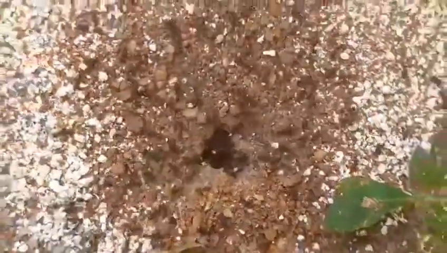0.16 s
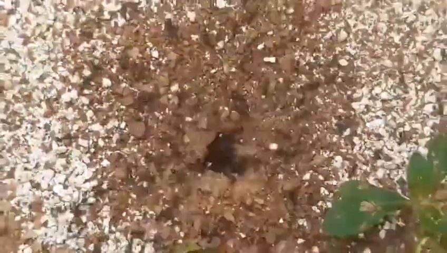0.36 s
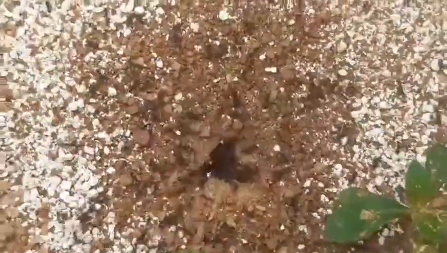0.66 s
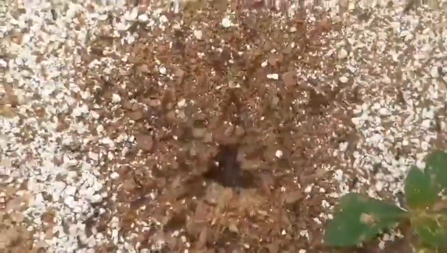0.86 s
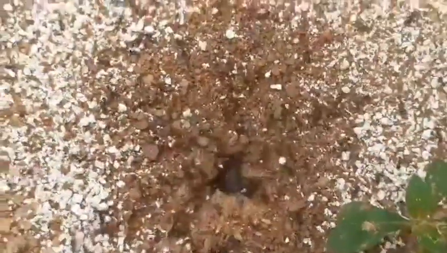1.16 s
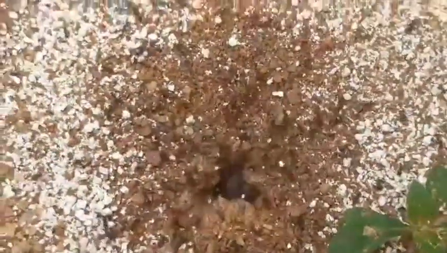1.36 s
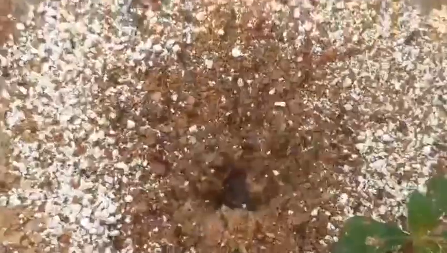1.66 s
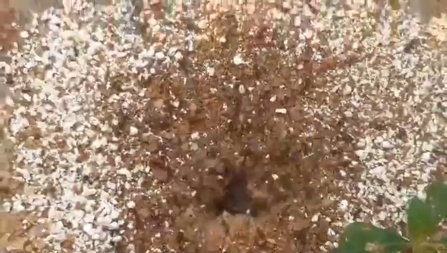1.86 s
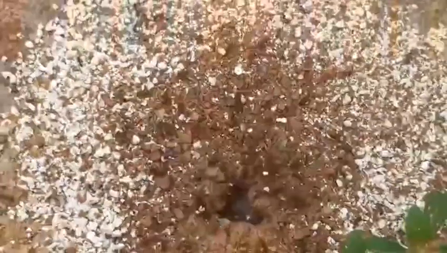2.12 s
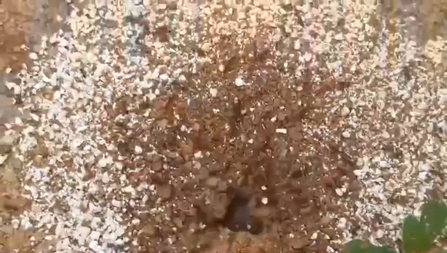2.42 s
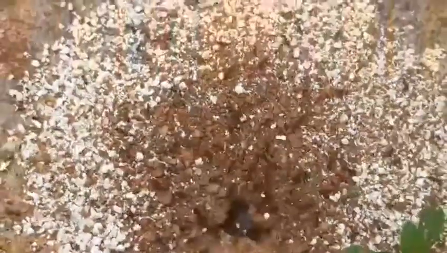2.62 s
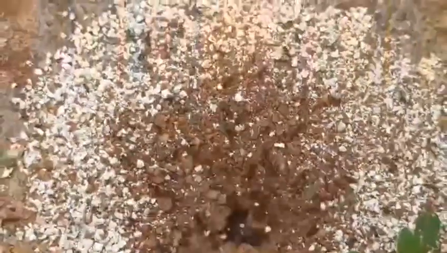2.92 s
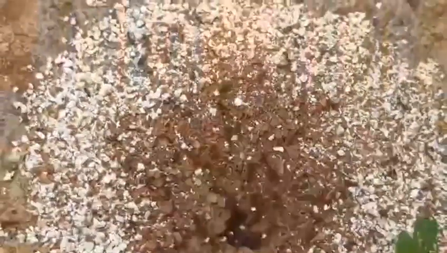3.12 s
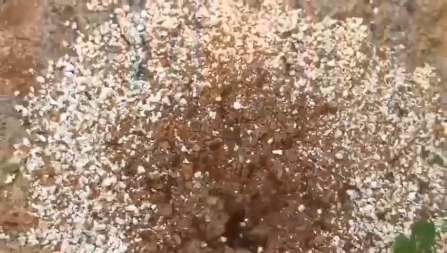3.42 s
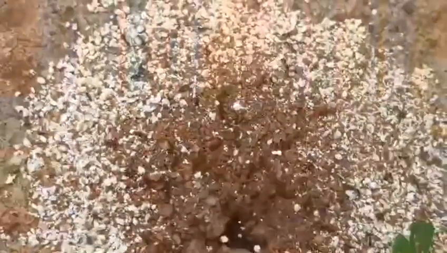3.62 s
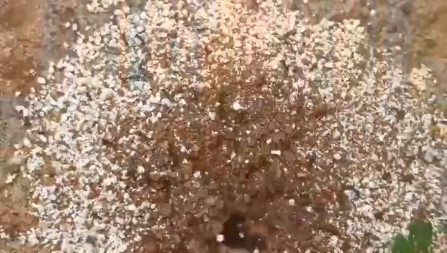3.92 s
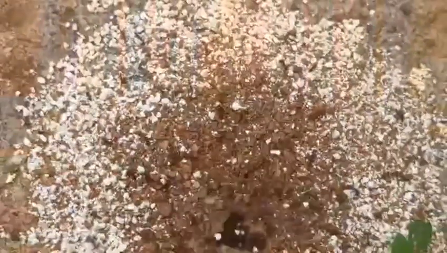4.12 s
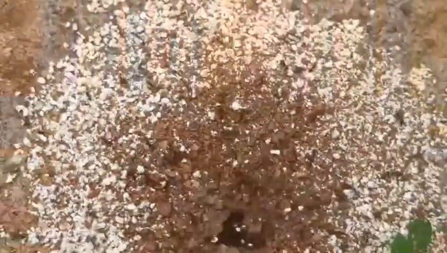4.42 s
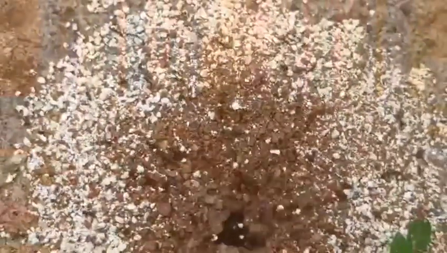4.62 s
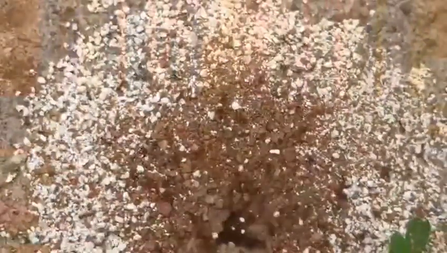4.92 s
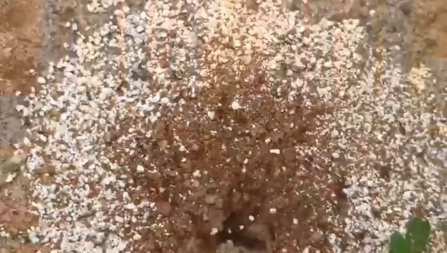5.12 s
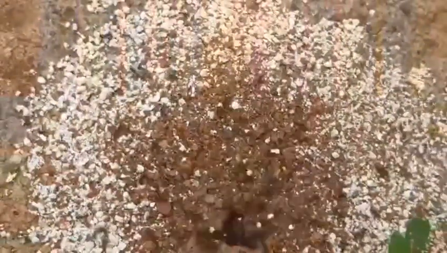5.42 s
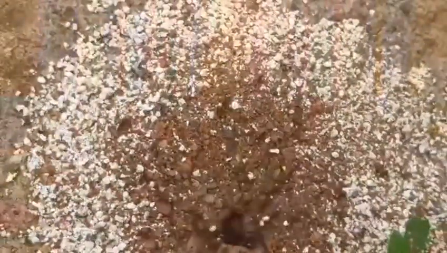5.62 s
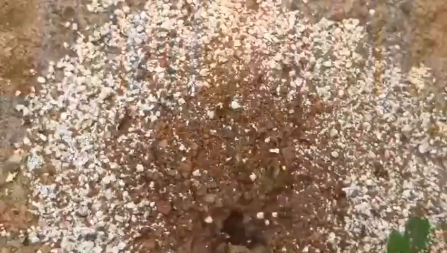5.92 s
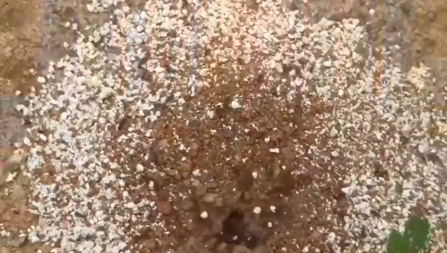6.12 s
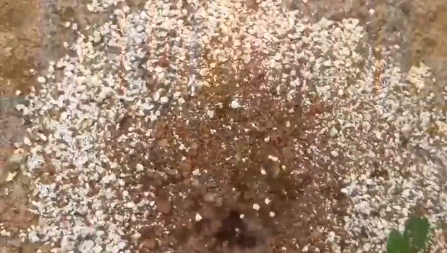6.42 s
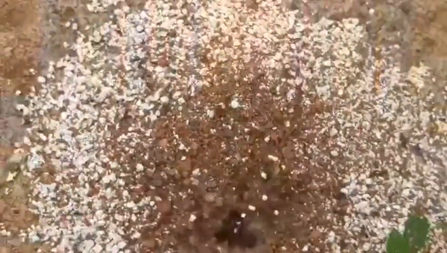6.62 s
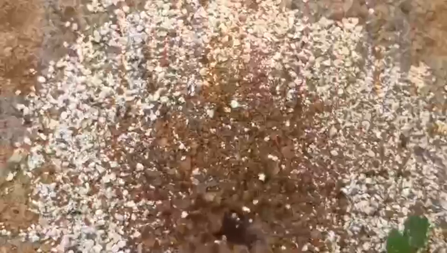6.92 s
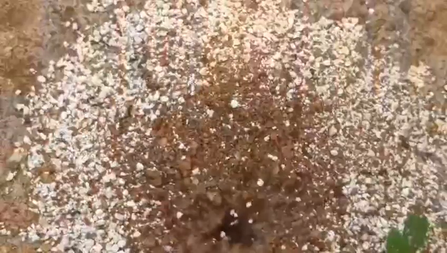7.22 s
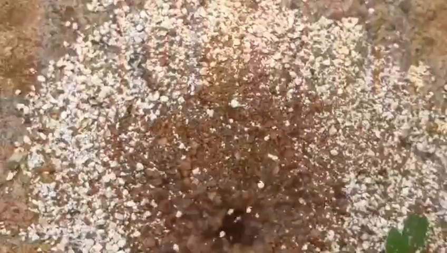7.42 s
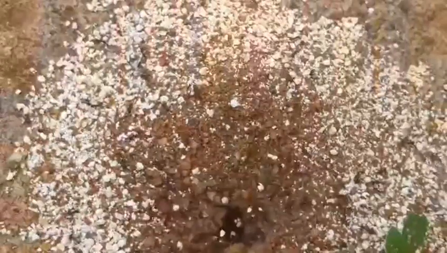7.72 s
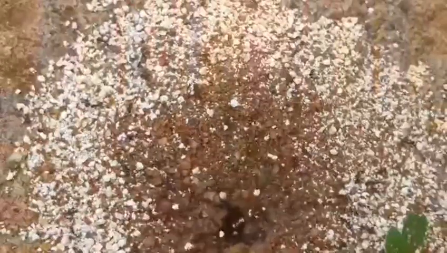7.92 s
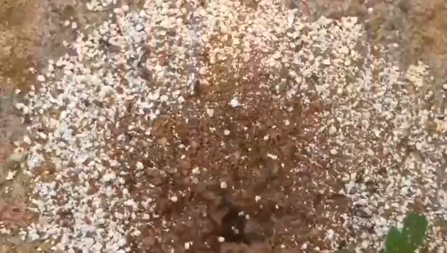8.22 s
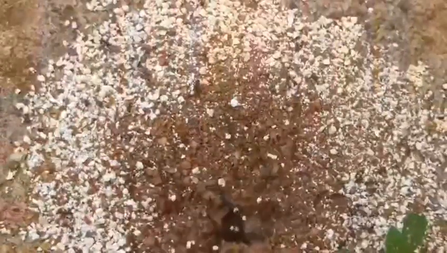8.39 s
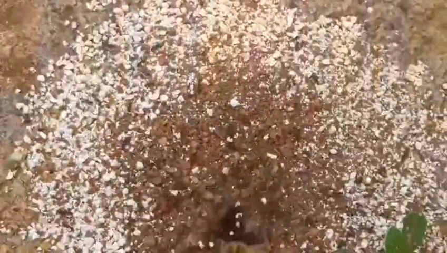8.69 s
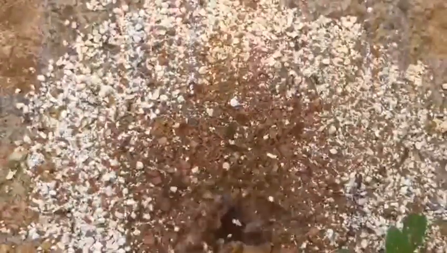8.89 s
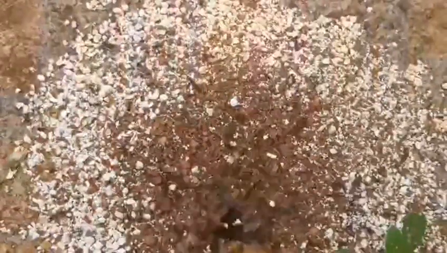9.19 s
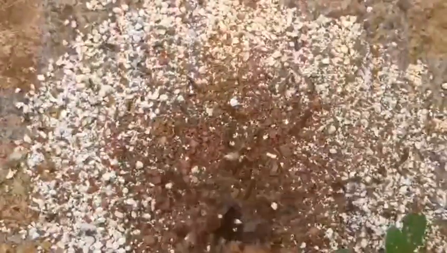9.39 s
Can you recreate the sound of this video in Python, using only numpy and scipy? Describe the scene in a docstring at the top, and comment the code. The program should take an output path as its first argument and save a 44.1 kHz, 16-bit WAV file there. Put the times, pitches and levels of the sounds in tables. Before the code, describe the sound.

From the start, gusts of wind rumble and pop unevenly on the microphone over a faint outdoor hiss. On the right, one small animal repeats a rough, rising chirp two or three times a second, while several others join in with short, high pips in a quick, irregular pattern. The calls have a slight echo. The wind builds to its strongest just after 2 seconds, when a dull knock sounds on the right. From about 3 seconds the gusts weaken, and by about 6 seconds only light puffs remain. Much fainter knocks come at around 4.4, 6.5, 7.5 and 8.9 seconds, the last ones barely audible. The calls continue throughout, with the pips growing louder from about 7 seconds and carrying on to the end at around 9.5 seconds.

```python
"""Small animals call outdoors in the wind. From the start, over faint air, gusts and eddies buffet both
microphone ports; the left is nearly shut to the air and carries mostly its own wind. At once one animal
repeats a rough rising chirp, then several join with short level pips; walls throw the calls back.
Just after 2 s the wind peaks and the first of five ever fainter dull knocks sounds on the right.
The gusts then die down while the calls go on to the end, the pips louder from about 7 s."""
import sys
import numpy as np
from scipy import signal
from scipy.fft import rfft, irfft
from scipy.io import wavfile
from scipy.ndimage import uniform_filter1d

SR = 44100
rng = np.random.default_rng(int(sys.argv[2]) if len(sys.argv) > 2 else 0)


def put_to_file(sound):
    """Save the sound as 16-bit audio at rate SR, in the file named by the first command-line argument."""
    columns = np.atleast_2d(sound).T  # one column per channel
    safe = np.clip(columns, -1, 1)
    whole_steps = np.round(safe * 32767)
    wavfile.write(sys.argv[1], SR, whole_steps.astype(np.int16))


N = 421155
EDGE_HZ = 15750  # top of the audible band
# tone colour of the chirps and breath noise, peaks near 2.5 and 6 kHz, faint fizz near 14 kHz:
# f/Hz, gain/dB
CALL_COLOUR = [(1200, -44), (1750, -15.5), (2200, 2), (2700, 3.5), (3200, -10.5), (3700, -1.5),
               (4500, -10.5), (5300, -17.5), (6000, 0), (6800, -5.5), (7250, -17.5), (7700, -59.5),
               (9800, -51.5), (11500, -37.5), (13800, -27), (15500, -44.5)]


def gain_of(db):
    """Decibels to a factor."""
    return 10 ** (np.asarray(db) / 20)


def unit_rms(x):
    """Scaled to rms 1."""
    return x / np.sqrt(np.mean(x ** 2) + 1e-20)


def curve_at(points, hz):
    """Value of a curve at hz, with straight lines on a log frequency axis."""
    f, value = np.transpose(points)
    return np.interp(np.log(hz + 1), np.log(f + 1), value)


def add(mix, s, sound):
    """Mixes sound in at time s."""
    at = round(s * SR)
    part = mix[max(at, 0):][:len(sound) + min(at, 0)]
    part += sound[max(-at, 0):][:len(part)]


def wobble(count, hz):
    """Random drift of rms 1, up to about hz."""
    drift = signal.lfilter(*signal.butter(2, hz, fs=SR), rng.standard_normal(count + 2000))
    return unit_rms(drift[2000:])


def shaped_noise(db, size=1024):
    """Noise whose short-time spectrum follows db (bins x frames)."""
    spectra = rng.standard_normal(db.T.shape).T + 1j * rng.standard_normal(db.T.shape).T
    return signal.istft(spectra * gain_of(db), nperseg=size, noverlap=size - size // 4)[1][:N]


def air(patchy_db=2.9):
    """A faint, slightly patchy bed of outdoor hiss, louder at the open right port."""
    # bed spectrum at each port, before the swell: f/Hz, level/dB per Hz
    left_colour = [(60, -102), (200, -108), (350, -104), (600, -116), (1300, -119), (2800, -121),
                   (5500, -127), (7400, -134), (9000, -128), (13300, -123), (15500, -132)]
    right_colour = [(60, -108.9), (200, -109.3), (350, -96.5), (600, -101.6), (1200, -107.6), (2000, -96.5),
                    (2800, -99.5), (4200, -99.1), (6000, -99), (7400, -111.6), (8800, -140.0),
                    (11000, -122.8), (13500, -120.9), (15500, -129.9)]
    # fader ride on the right bed: t/s, gain/dB
    swell = [(0, 9.5), (2.3, 8.5), (2.42, 2), (2.7, 5), (3.4, 4), (9.55, 3)]
    hz, frames, beds = np.fft.rfftfreq(1024, 1 / SR), N // 256 + 3, []
    for colour in left_colour, right_colour:
        patches = uniform_filter1d(rng.standard_normal((frames, len(hz))), 14, axis=0)
        patches = unit_rms(uniform_filter1d(patches, 12, axis=1)).T
        level_db = curve_at(colour, hz)
        rms = np.sqrt(gain_of(2 * level_db).sum() * hz[1])
        beds.append(rms * unit_rms(shaped_noise(level_db[:, None] + patchy_db * patches)))
    swell_db = np.interp(np.arange(N) / SR, *np.transpose(swell))
    return np.array([beds[0], beds[1] * gain_of(swell_db)])


def gusting(t, port, rise_db_per_s=261, fall_db_per_s=167, calm_db=-83.5):
    """Wind envelope in dB at a port: each gust rises, holds and falls over the calm."""
    # gusts: t/s, hold/s, level/dB, port (0 left, 1 right)
    gusts = [(0.058, 0.05, -25, 1), (0.4, 0.17, -40.5, 1), (0.801, 0.04, -31, 1), (0.938, 0.06, -34.5, 1),
             (1.24, 0.05, -33.5, 1), (1.5, 0.06, -33.5, 1), (1.801, 0.2, -27.5, 1), (2.06, 0.21, -20.5, 1),
             (2.56, 0.16, -40.5, 1), (2.789, 0.03, -32, 1), (3.019, 0.04, -30, 1), (3.25, 0.36, -48.5, 1),
             (4.2, 0.1, -51, 1), (4.42, 0.15, -63.5, 1), (5.78, 0.05, -60.5, 1), (0.0, 0.03, -41.5, 0),
             (0.39, 0.03, -48, 0), (0.87, 0.03, -51.5, 0), (1.2, 0.9, -55, 0), (2.24, 0.08, -29, 0),
             (2.47, 0.04, -35, 0), (2.619, 0.04, -28, 0), (2.79, 0.04, -32.5, 0), (2.92, 0.22, -40, 0),
             (3.4, 0.08, -48, 0), (3.719, 0.4, -51.5, 0), (4.22, 0.1, -50, 0), (4.5, 0.07, -58.5, 0),
             (5.27, 0.06, -45.5, 0), (5.4, 0.075, -53.5, 0), (6.15, 0.1, -73, 0), (6.9, 0.25, -58.5, 0),
             (7.7, 0.15, -67.5, 0)]
    power = np.full(len(t), gain_of(2 * calm_db))
    for s, held_s, db, at_port in gusts:
        if round(at_port) == port:
            attack_db = rise_db_per_s * np.maximum(s - t, 0)
            release_db = fall_db_per_s * np.maximum(t - s - held_s, 0)
            power += gain_of(2 * (db - attack_db - release_db))
    return 10 * np.log10(power)


def wind(lumpy_db=3.0, trim_db=0.5, thin_db=16.5, small_eddies=120, eddy_over_wind_db=5):
    """Lumpy rumble, unrelated at the two ports and brighter when strong, with pops from single eddies."""
    # tone of light and of strong wind: f/Hz, relative level/dB
    breeze = [(15, -36.5), (25, -17), (50, 2), (107, 4.5), (160, -26.5), (220, -32.5), (330, -22),
              (480, -44), (1000, -67), (2200, -95.5)]
    strong_wind = [(15, -51), (25, -23), (97, 7), (228, -12.5), (300, -1), (356, -10.5), (718, -34.5),
                   (1030, -45.5), (1160, -58.5), (1500, -54), (1950, -83.5), (3300, -120)]
    # the strongest eddies to hit a port: t/s, level/dB, f/Hz, port (0 left, 1 right)
    big_eddies = [(0.068, -13, 95, 1), (0.084, -14.5, 142, 1), (0.116, -19.5, 202, 1),
                  (0.813, -17.5, 164, 1), (0.832, -16.5, 130, 1), (0.854, -15.5, 114, 1),
                  (1.246, -22, 100, 1), (1.487, -18.5, 117, 1), (1.803, -13, 183, 1), (1.854, -14, 149, 1),
                  (1.891, -13.5, 230, 1), (1.917, -13.5, 128, 1), (1.99, -10.5, 106, 1),
                  (2.016, -12.5, 121, 1), (2.081, -14.5, 132, 1), (2.1, -12, 175, 1), (2.132, -6.5, 145, 1),
                  (2.239, -7, 161, 1), (2.258, 0.57, 263, 1), (2.276, -15, 144, 1), (2.347, -11, 183, 1),
                  (2.363, -18, 147, 1), (2.364, -18.5, 122, 0), (2.665, -24.5, 112, 0),
                  (3.016, -22.5, 264, 1)]
    hz, t, out = np.fft.rfftfreq(1024, 1 / SR), np.arange(N) / SR, np.zeros((2, N))
    frame_s = np.arange(N // 256 + 3) * 256 / SR
    # from 2.42 to 3.8 s the right side loses its bass for a reedier flutter
    thin = np.clip((frame_s - 2.42) / .08, 0, 1) * np.clip((3.8 - frame_s) / .2, 0, 1)
    eddies = list(big_eddies)
    for port in range(2):
        level_db = gusting(frame_s, port)
        strength = np.clip((level_db + 50.5) / 30, 0, 1)
        colour_db = np.outer(curve_at(breeze, hz), 1 - strength)
        colour_db += np.outer(curve_at(strong_wind, hz), strength)
        colour_db -= port * np.outer(hz < 180, thin_db * thin - 2.0)
        colour_db -= 10 * np.log10(gain_of(2 * colour_db).sum(0))  # equal power in every frame
        rumble = shaped_noise(colour_db)
        lumps = gain_of(lumpy_db * wobble(N, 45) + 2 * wobble(N, 12))
        out[port] = gain_of(np.interp(t, frame_s, level_db) + trim_db) * unit_rms(rumble * lumps)
        for when, pitch in rng.random((small_eddies, 2)):  # as strong as the wind allows
            s = when * N / SR
            eddy_db = np.interp(s, frame_s, level_db) + eddy_over_wind_db
            eddies.append((s, eddy_db, np.interp(pitch, [0, 1], [100, 260]), port))
    pop_t = np.arange(-882, 882) / SR
    for s, eddy_db, pop_hz, port in eddies:  # an eddy swings the membrane for a cycle or two
        swing = np.cos(2 * np.pi * pop_hz * pop_t + rng.uniform(-0.75, 1))
        envelope = np.exp(-(pop_t * pop_hz / 0.47) ** 2)
        add(out[round(port)], s + pop_t[0], gain_of(eddy_db) * swing * envelope)
    return signal.lfilter(*signal.butter(2, 70, "high", fs=SR), out)  # the vent lets slow pressure escape


def breath(count):
    """Air noise with peaks near 2.5 and 6 kHz."""
    colour = gain_of(curve_at(CALL_COLOUR, np.fft.rfftfreq(count, 1 / SR)))
    return unit_rms(irfft(rfft(rng.standard_normal(count)) * colour, count))


def chirp(db, early_db, roughness=.28, breath_db=-13):
    """Harmonics sweep up through a fixed tone colour: the second squeals, then the first and third."""
    # contour of one chirp: t/ms, f/Hz, relative level/dB
    contour = [(-10, 1400, -32), (4, 1500, -14), (10, 1600, 0), (13, 1700, -2), (15, 1850, -9),
               (19, 1990, -2), (26, 2150, 0), (33, 2310, -1), (37, 2260, -10), (43, 2100, -45)]
    at_ms, pitch_hz, shape_db = np.transpose(contour)
    squeal_db = early_db - db
    upper_db = 3.5 + 0.3 * (-35 - db)  # in a weak chirp, partials from the third up drop less
    ms = np.arange(at_ms[0], at_ms[-1], 1000 / SR)
    hz = np.interp(ms, at_ms, pitch_hz) * (1 + 0.021 * wobble(len(ms), 300)) * rng.uniform(0.94, 1.03)
    phase = 2 * np.pi * np.cumsum(hz) / SR
    voice = gain_of(breath_db + .8 * squeal_db) * breath(len(ms))
    source_db = [0, squeal_db * np.clip((4000 - 2 * hz) / 500, 0, 1), upper_db]
    source_db += [upper_db - 8 * (k * hz < 8000) for k in range(4, 11)]
    for k, partial_db in enumerate(source_db, 1):
        level_db = curve_at(CALL_COLOUR, k * hz) + partial_db - 60 * (k * hz > EDGE_HZ)
        flutter = 1 + roughness * min(k, 4) / 2 * wobble(len(ms), 400)
        voice += gain_of(level_db) * np.sin(k * phase) * flutter
    envelope = np.sqrt(2) * gain_of(db + np.interp(ms, at_ms, shape_db))
    return at_ms[0] / 1000, envelope * voice


def pip(held_ms, hz, db, second_db, break_db, lead_ms=11, high_voice_hz=2855):
    """A breathy scoop leads to a clean held note; at its end the voice may break, briefly hoarse."""
    ms = np.arange(-lead_ms, held_ms + 25, 1000 / SR)
    count = len(ms)
    half_rise = (2.9 + 0.1857 * break_db) / 200  # the note rises more before a harder break
    bend = np.interp(ms, [-lead_ms, -4, -1, 2, held_ms, held_ms + 8],
                     [.72, .78, .93, 1 - half_rise, 1 + half_rise, .76])
    shape_ms = [-lead_ms, -6, -2, 1.5, 0.79 * held_ms, held_ms, held_ms + 3, held_ms + 8, ms[-1]]
    shape_db = np.interp(ms, shape_ms, [-34, -18, -24, -3, 0, -5, -17 + .2 * break_db, -30, -90])
    jitter = 0.0048 + 0.35 * np.clip(.97 - bend, 0, 1)  # steady only on the held note
    phase = 2 * np.pi * np.cumsum(hz * bend * (1 + jitter * wobble(count, 300))) / SR
    voice = np.sin(phase) + gain_of(second_db) * np.sin(2 * phase + 1) * (1 + 0.18 * wobble(count, 150))
    voice += gain_of(-21) * breath(count)
    # fuzzy upper partials, by where they fall: f/Hz, level/dB against the second partial
    overtones = [(4000, -13.5), (6200, -10), (7000, -5), (8100, -21.5), (8600, -59.5), (10600, -39),
                 (12000, -50), (13400, -35), (14600, -46.5)]
    for k in range(3, 6):
        level_db = second_db + curve_at(overtones, k * hz * bend)
        voice += gain_of(level_db) * np.sin(k * phase) * (1 + 0.12 * wobble(count, 330))
    puff = gain_of(-19) * np.exp(-((ms + 5) / 5) ** 2) * breath(count)

    break_phase = 2 * np.pi * np.cumsum(2110 * (1 + 0.041 * wobble(count, 300))) / SR
    hoarse = 0.42 * np.sin(break_phase) + 0.24 * np.sin(2 * break_phase) + np.sin(3 * break_phase)
    hoarse += 0.59 * breath(count)
    hoarse *= gain_of(break_db) * np.exp(-((ms - held_ms - 7) / 5) ** 2)

    # brief high fizz at 11.5-14.3 kHz at the pip's end, with a thin tone on lower pips
    fizz_db = (-64.5 if hz > high_voice_hz else -52) + 0.2 * break_db - db
    hiss = signal.lfilter(*signal.butter(3, [11500, 14300], "band", fs=SR), rng.standard_normal(count))
    on_pitch = 1 - 10 * np.clip(1 - bend, 0, .1)
    thin_tone = on_pitch * np.sin(5 * phase) * (1 + .5 * wobble(count, 500))
    fizz = 0.45 * unit_rms(hiss) + (hz < high_voice_hz) * thin_tone
    fizz *= gain_of(fizz_db) * np.exp(-((ms - 1.2 * held_ms) / 10) ** 2)
    envelope = np.sqrt(2) * gain_of(db) * signal.windows.tukey(count, .2)
    return -lead_ms / 1000, envelope * (gain_of(shape_db) * voice + puff + hoarse + fizz)


def wall_echoes(far_db=-22, far_t60_s=0.68, fade_in_ms=9):
    """Three sparse reverb tails for three places: near walls die fast, far ones linger."""
    # decay of the near walls: f/Hz, T60/s
    near_t60 = [(2000, 0.17), (4000, 0.23), (6000, 0.22), (12000, 0.15)]
    taps = np.zeros((3, SR))
    at = np.arange(0, SR - 22, 22) + rng.integers(0, 22, (3, (SR - 1) // 22))
    np.put_along_axis(taps, at, rng.choice([-1., 1.], at.shape), 1)
    wall_db = 3.2 * rng.standard_normal((3, SR // 441 + 1))  # some walls answer louder
    taps *= gain_of(wall_db).repeat(441, 1)[:, :SR]
    hz, t, spectra = signal.stft(taps, SR, nperseg=256)
    decay = gain_of(-60 * t / curve_at(near_t60, hz)[:, None]) + gain_of(far_db - 60 * t / far_t60_s)
    fade_in = np.clip(np.arange(SR) / SR * 1000 / fade_in_ms, 0, 1) ** 2
    tails = signal.istft(spectra * decay, SR, nperseg=256)[1][:, :SR] * fade_in
    return tails / np.linalg.norm(tails, axis=1)[:, None]


def animals(pip_wet_db=-4, chirp_wet_db=-2.5):
    """All calls, direct and off the walls; they take the three tails in turn, as if shifting place."""
    # chirp cues, before the tone colour: t/s, level/dB, early squeal level/dB
    chirps = [(0.002, -36, -30), (0.37, -35, -29.5), (0.71, -36, -29), (1.258, -40.5, -30),
              (1.694, -36.5, -29), (2.132, -37, -26.5), (2.5, -40, -30.5), (2.811, -38, -29),
              (3.105, -35.5, -27.5), (3.444, -36.5, -29), (3.729, -36, -30), (4.046, -35.5, -28.5),
              (4.351, -35.5, -29), (4.834, -37.5, -27), (5.185, -35.5, -28.5), (5.626, -39.5, -30.5),
              (6.066, -35.5, -29), (6.362, -35.5, -41.5), (6.431, -35, -29), (6.833, -38.5, -30),
              (7.205, -41.5, -30), (7.462, -34.5, -27.5), (7.828, -37.5, -28), (8.195, -47.5, -30),
              (8.581, -48, -29), (8.968, -39.5, -27.5), (9.392, -44, -24.5)]
    # pip cues: t/s, hold/ms, f/Hz, level/dB, second partial/dB, closing break/dB (last two relative)
    pips = [(0.129, 11.6, 2890, -33.5, 0, -7), (0.325, 14, 2768, -33, 6.5, 0.5),
            (0.467, 24, 2890, -41, 3, -4), (0.684, 20.6, 2784, -33.5, 7.5, -2.5),
            (0.773, 17, 2910, -35, -1, -22), (0.801, 15.8, 2678, -33, 7.5, -10),
            (1.121, 15.3, 2747, -33, 7.5, 1), (1.149, 23, 2946, -37.5, 4, -8),
            (1.24, 13.6, 2682, -33, 6, -4), (1.464, 14.3, 2865, -37.5, 2, -27),
            (1.595, 20.6, 2748, -35, 8, 0.5), (1.719, 12.5, 2662, -32.5, 4, -8),
            (1.831, 24, 2853, -34.5, -1.5, -31), (2.067, 14.5, 2760, -29.5, 5.5, -1),
            (2.188, 14, 2895, -34, 0, -8), (2.211, 9.7, 2650, -36, 8.5, -21),
            (2.544, 21, 2757, -35.5, 5.5, 0.5), (2.819, 5.6, 2897, -30.5, 1.5, -7),
            (2.901, 22, 2760, -33, 5.5, -5), (3.042, 18, 2582, -37, 3, -8),
            (3.18, 11.4, 2900, -33.5, 0, -17), (3.388, 20.7, 2748, -33, 3.5, -19),
            (3.515, 10.6, 2887, -30, 0.5, -15), (3.864, 9.5, 2898, -31.5, 0.5, -29),
            (4.084, 20.6, 2797, -35, 8, -6), (4.158, 9, 2840, -30.5, 3.5, -38.5),
            (4.188, 13, 2667, -32.5, 6.5, -28), (4.485, 21, 2768, -29, -4, -37),
            (4.726, 13, 2725, -30.5, 4.5, -26), (4.897, 6.9, 2860, -33, 0, -10),
            (5.208, 15.3, 2790, -31.5, 1.5, -8), (5.454, 18.7, 2312, -39, 2, -29),
            (5.725, 14, 2900, -31, 0.5, -13), (5.742, 11, 2560, -33.5, -0.5, -5),
            (6.029, 7.1, 2830, -29, -1.5, -4.5), (6.361, 13.5, 2890, -32.5, 2, -1.5),
            (6.673, 14, 2874, -32.5, 0.5, -27.5), (6.775, 10, 2737, -35, 0, -1.5),
            (7.052, 18, 2885, -35, 2, -41), (7.194, 8.1, 2760, -28.5, -6, -6),
            (7.422, 11.8, 2912, -32.5, 1.5, -22.5), (7.514, 14.3, 2734, -25, -2.5, -10),
            (7.638, 15, 2620, -31, -2, -11.5), (7.74, 13, 2880, -29.5, -1, -29),
            (7.851, 17.2, 2713, -25.5, 2, -5), (7.995, 14.3, 2665, -28, -0.5, -4.5),
            (8.06, 11.4, 2870, -29.5, 2, -32), (8.258, 20.8, 2685, -28, -0.5, -4),
            (8.381, 13, 2890, -28, -2, -29), (8.396, 9.5, 2630, -29, 0.5, -29.5),
            (8.688, 18, 2680, -28, 0.5, -3.5), (8.762, 9, 2886, -28, -2, -31),
            (8.817, 11.4, 2595, -27, -2, -10.5), (9.111, 15, 2900, -30, -1.5, -37.5),
            (9.221, 21, 2752, -26, 0.5, -11.5), (9.342, 11.5, 2616, -28, -1, -10),
            (9.427, 11.6, 2940, -26.5, 0, -27)]
    calls = [(s, pip(*row), pip_wet_db) for s, *row in pips]
    calls += [(s, chirp(*row), chirp_wet_db) for s, *row in chirps]
    direct, sends = np.zeros(N), np.zeros((3, N))
    for k, (s, (offset_s, sound), wet_db) in enumerate(calls):
        add(direct, s + offset_s, sound)
        add(sends[k % 3], s + offset_s, gain_of(wet_db) * sound)
    return direct + signal.fftconvolve(sends, wall_echoes(), axes=1)[:, :N].sum(0)


def knocks():
    """Dull little taps, damped too fast to ring."""
    # knock cues: t/s, gain/dB
    hits = [(2.128, -13), (4.373, -39), (6.45, -50), (7.485, -52), (8.851, -59)]
    out, t = np.zeros(N), np.arange(600) / SR
    body = np.sin(2 * np.pi * 560 * t) + 0.22 * np.sin(2 * np.pi * 950 * t)
    envelope = np.exp(-t / .002) * (1 - np.exp(-t / .001))
    for s, db in hits:
        add(out, s, gain_of(db) * body * envelope)
    return out


def scene():
    """Wind and air on both sides, calls and knocks right; a trace of the calls leaks left, inverted."""
    calls = animals()
    leak = -gain_of(-48.5) * signal.lfilter(*signal.butter(2, [2050, 2450], "band", fs=SR), calls)
    return np.array([leak, calls + knocks()]) + wind() + air()


def record(dry):
    """A steep low-pass takes off the very top."""
    low_pass = signal.firwin(511, EDGE_HZ, window=("kaiser", 9), fs=SR)
    return signal.oaconvolve(dry, low_pass[None], "same")


dry = scene()
out = record(dry)
put_to_file(out)
```